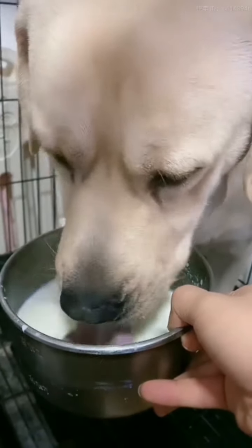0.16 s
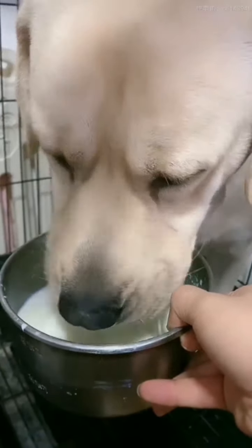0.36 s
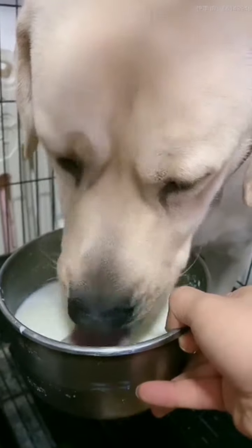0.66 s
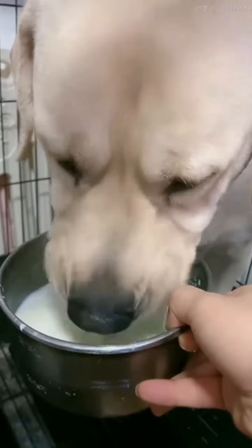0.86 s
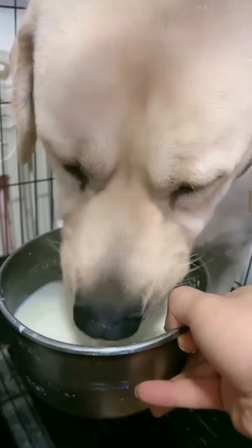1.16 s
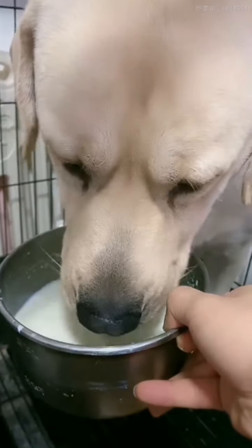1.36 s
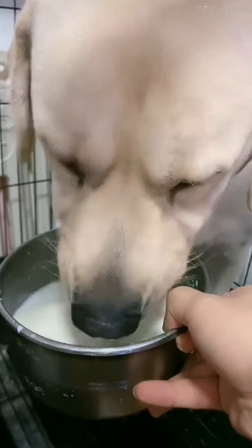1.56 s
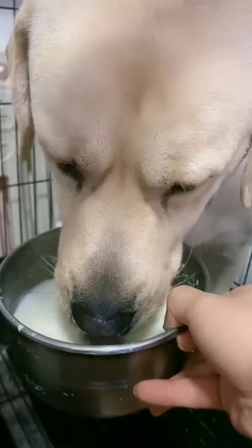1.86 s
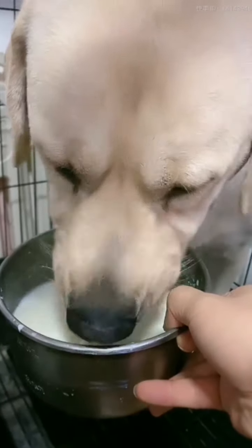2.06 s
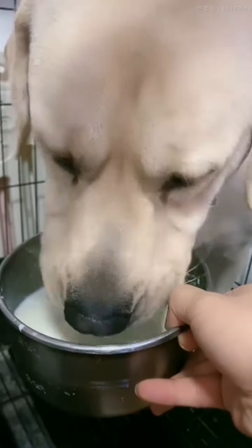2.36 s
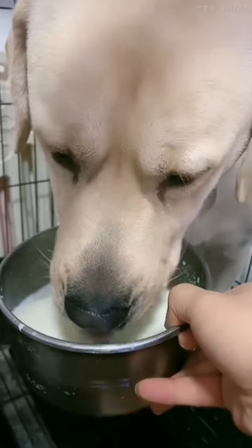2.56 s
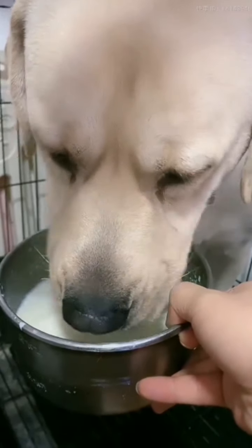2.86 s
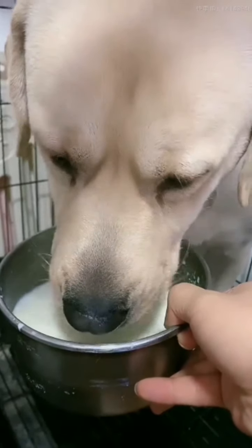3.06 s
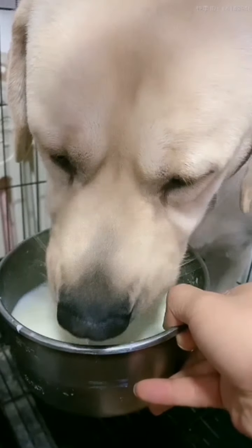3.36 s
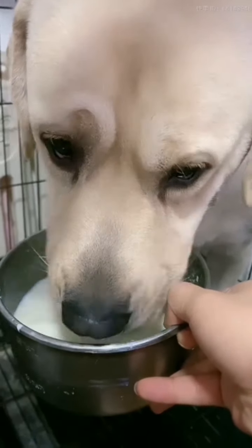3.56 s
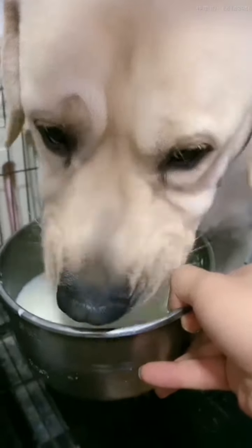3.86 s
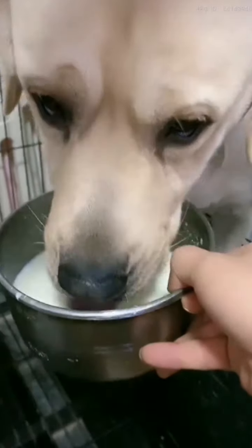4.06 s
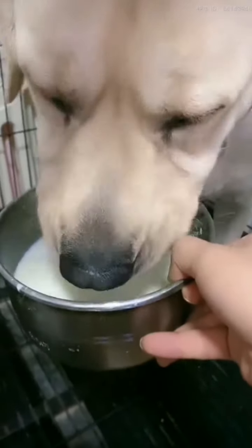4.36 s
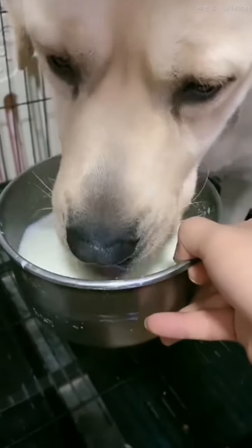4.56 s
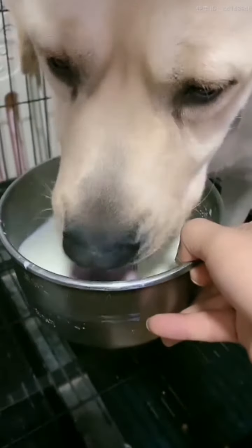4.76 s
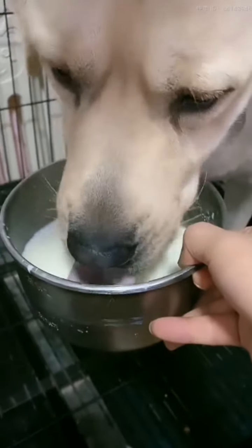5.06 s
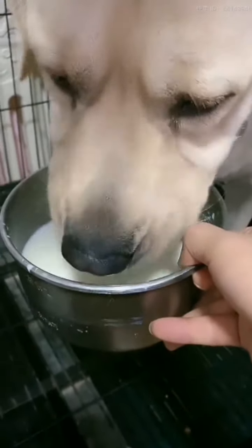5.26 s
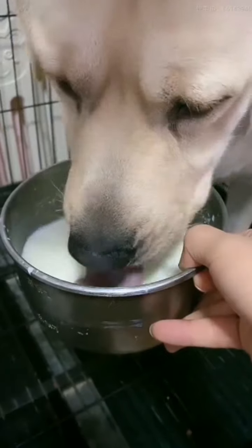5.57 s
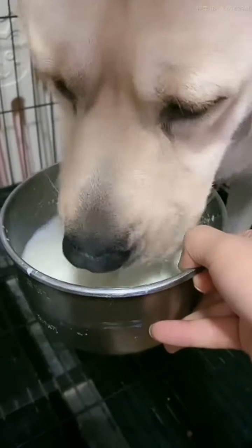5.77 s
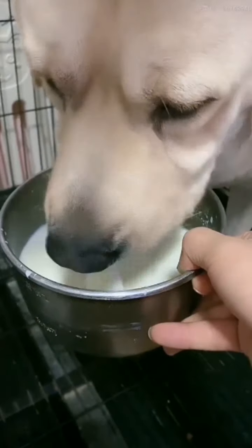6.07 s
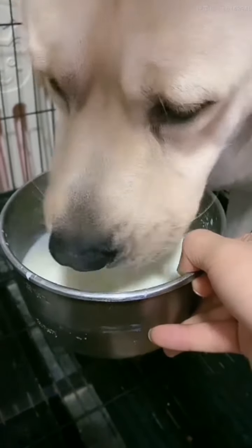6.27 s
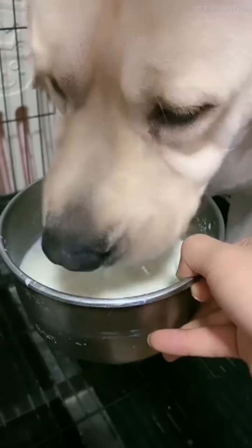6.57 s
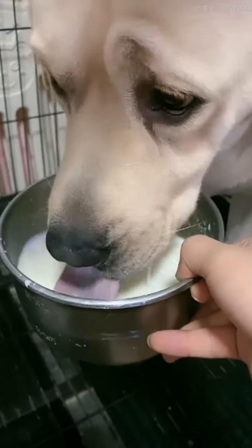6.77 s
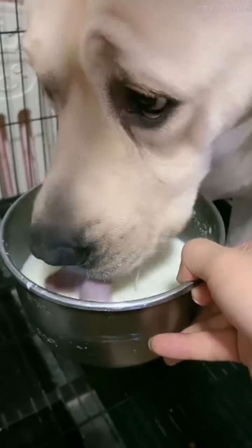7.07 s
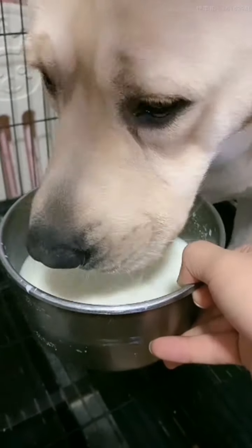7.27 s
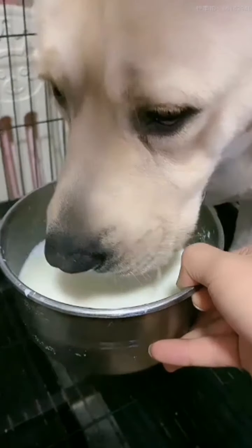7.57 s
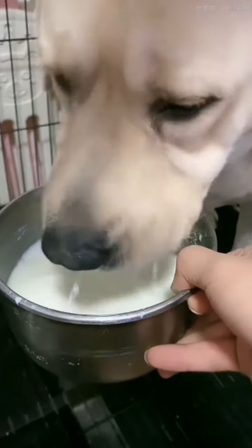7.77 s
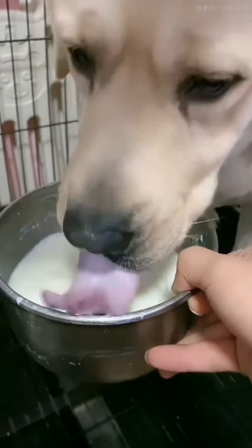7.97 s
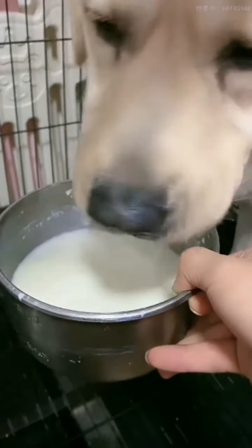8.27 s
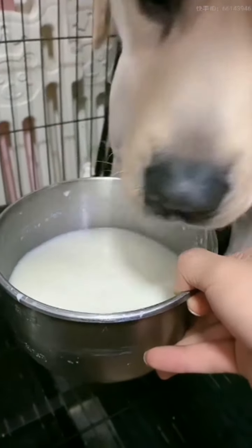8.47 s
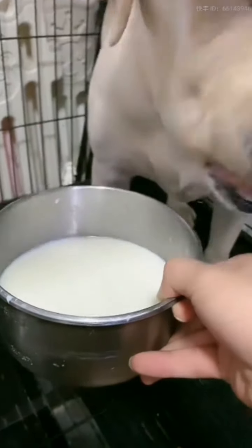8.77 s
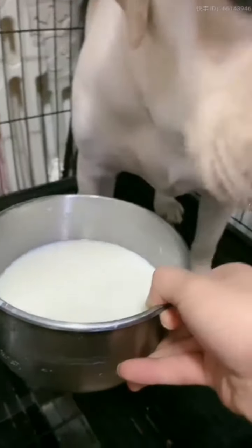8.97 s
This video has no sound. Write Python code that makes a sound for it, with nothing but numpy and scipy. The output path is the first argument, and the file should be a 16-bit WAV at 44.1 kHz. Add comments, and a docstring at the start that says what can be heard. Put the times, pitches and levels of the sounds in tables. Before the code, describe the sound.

A dog steadily laps milk from a steel bowl, a little over two wet plopping laps a second, louder toward the end, in a small hard room.

```python
"""In a small hard room, a dog laps milk from a hand-held steel bowl, a little over two laps a second.
The tongue's slap is a short-lived ringing air cavity with splash; bubbles and drops are brief rising notes.
The jaws shut with a low falling gulp and a squelch of bubble noise; milk crackles, smacks and slurps.
Steel modes, echoes and decaying noise are the answer of bowl and walls, over mains hum and a growing hiss."""
import sys
import numpy as np
from scipy import signal
from scipy.fft import rfft, irfft, next_fast_len
from scipy.io import wavfile

SR = 44100
rng = np.random.default_rng(int(sys.argv[2]) if len(sys.argv) > 2 else 0)


def master(y):
    """Save y as 16-bit WAV."""
    cut = np.clip(np.atleast_2d(y).T, -1, 1)
    pcm = np.round(cut * 32767)  # scale
    wavfile.write(sys.argv[1], SR, pcm.astype(np.int16))


N = 402633

# jaws shut: (time [s], relative gulp level [dB], relative squelch level [dB])
GULPS = [(0.010, -44, -31), (0.359, -31, -30.5), (0.877, -42, -16), (1.275, -37, -20.5),
         (1.673, -25, -26.5), (2.208, -27.5, -25.5), (2.592, -29, -25), (3, -27, -33), (3.552, -20.5, -19),
         (3.966, -22.5, -23.5), (4.414, -21, -31), (4.936, -22.5, -20.5), (5.333, -19.5, -24.5),
         (5.741, -20, -30), (6.231, -23.5, -16.5), (6.609, -17.5, -26.5), (7.014, -26.5, -20),
         (7.433, -24.5, -25.5), (7.991, -13.5, -11.5), (8.443, -11, -26), (9.105, -16.5, -32.5)]
# spectrum of crackling milk: (frequency [Hz], relative density [dB per Hz])
CRACKLE_SPECTRUM = [(120, -38), (300, -31.5), (600, -5), (900, -9.5), (1500, 0.5), (2200, 0), (3000, 3),
                    (3850, 0.5), (4400, -11.5), (5200, -6), (6200, -16), (7700, -17), (9200, -51),
                    (13000, -47), (15500, -53)]


def amp(db):
    """Level as a gain: 20 dB is a factor of ten in amplitude."""
    return 10 ** (np.asarray(db) / 20)


def unit(x):
    """Normalise the mean power: scale to rms 1."""
    return x / np.sqrt(np.mean(x ** 2) + 1e-20)


def along(points, hz):
    """Interpolate (frequency [Hz], value) points on a logarithmic frequency axis."""
    f, v = np.transpose(points)
    return np.interp(np.log(hz + 1), np.log(f + 1), v)


def curve(rows):
    """Interpolate (time [s], value) rows linearly at every sample."""
    return np.interp(np.arange(N) / SR, *np.transpose(rows))


def clock(count):
    """Sampling instants [s] of the first count samples."""
    return np.arange(count) / SR


def colour(x, spectrum):
    """Linear filtering: multiply the spectrum of x by a given one, then scale to rms 1."""
    size = next_fast_len(len(x))
    gain = amp(along(spectrum, np.fft.rfftfreq(size, 1 / SR)))
    return unit(irfft(rfft(x, size) * gain, size)[:len(x)])


def swell(t, peak_s):
    """Transient envelope: soft rise to 1 at peak_s, then exponential decay takes over."""
    u = t / max(peak_s, 1 / SR)
    return (u * np.exp(1 - u)) ** 2


def tone(hz):
    """Frequency modulation: the phase of the sine is the running sum of its pitch."""
    return np.sin(2 * np.pi * np.cumsum(hz) / SR)


def add(track, s, sound):
    """Superposition: mix a sound in at time s; what lies outside the track is dropped."""
    start = round(s * SR)
    sound, start = sound[max(-start, 0):], max(start, 0)
    track[start:start + len(sound)] += sound[:max(N - start, 0)]


def burst(sound, envelope):
    """Amplitude modulation with the envelope's energy, however the grains of the sound fall."""
    return unit(sound * envelope) * np.sqrt(np.mean(envelope ** 2))


def background(hum_hz=50, hum_db=-60.5, waver_db=1.15):
    """Background: a steady sine of mains hum, and filtered noise for hiss that grows louder and wavers."""
    # level of the hiss: (time [s], relative level [dB])
    hiss_level = [(0, -56), (4.7, -51.5), (5.3, -47), (7.6, -47.5), (9.13, -40)]
    # spectrum of the hiss: (frequency [Hz], relative density [dB per Hz])
    hiss_spectrum = [(25, -4.5), (70, -11.5), (130, 0.5), (300, -3), (700, -5.5), (1300, 10.5), (2600, 1.5),
                     (3700, -26), (4400, -19.5), (6000, -25.5), (9000, -29.5), (13000, -28.5), (15500, -37)]
    hum = amp(hum_db) * unit(tone(np.full(N, hum_hz)))
    waver = waver_db * colour(rng.standard_normal(N), [(6, 0), (40, -40), (200, -120)])
    hiss = colour(rng.standard_normal(N), hiss_spectrum)
    return hum + amp(curve(hiss_level) - 6 + waver) * hiss


def room(sound, early_db, tail_db, build_s=0.0055, shift=0.16):
    """Reverberation: direct sound, echoes that shift as the muzzle moves, then the decaying walls."""
    # decay of the walls: (frequency [Hz], time to fall 60 dB [s])
    wall_decay = [(200, 0.29), (500, 0.35), (1400, 0.27), (3500, 0.34), (8000, 0.16), (14000, 0.068)]
    # echoes from bowl, floor and cage: (nominal delay [s], relative level [dB])
    echo_rows = [(.0056, -9), (.0098, -7), (.017, -14.5)]
    hz, times, cells = signal.stft(rng.standard_normal(SR // 3), SR, nperseg=256)
    decay = amp(-60 * times / along(wall_decay, hz)[:, None])
    tail = signal.istft(cells * decay, SR, nperseg=256)[1]
    build_up = 1 - np.exp(-(clock(count=len(tail)) / build_s) ** 2)
    out = signal.fftconvolve(sound, tail * build_up)
    # tail_db is the energy of the tail relative to the direct sound
    out *= amp(tail_db) * np.linalg.norm(sound) / (np.linalg.norm(out) + 1e-20)
    out[:len(sound)] += sound
    for delay_s, db in echo_rows:
        start = round(abs(delay_s * (1 + shift * rng.uniform(-0.66, 1))) * SR)
        out[start:start + len(sound)] += amp(db + early_db) * sound
    return out


def bowl(x, ring_db=-3):
    """Modal resonance: every lapping sound faintly excites the steel, damped by milk and hand."""
    # modes of the steel: (frequency [Hz], relative level [dB], time to fall 60 dB [s])
    steel_modes = [(344.1, -19, 0.24), (618, -13.5, 0.027), (985.5, -18.5, 0.12), (1357, -24.5, 0.38),
                   (1494, -15.5, 0.12), (2490, -24.5, 0.11), (4960, -15.5, 0.026)]
    t = clock(count=SR // 2)
    ring = np.zeros(len(t))
    for hz, db, t60 in steel_modes:
        # a slowly dying mode is narrow and builds up to a high peak
        bandwidth_gain = 2 * np.log(1000) / (t60 * SR)
        ring += amp(db + 20 - 60 * t / t60) * np.cos(2 * np.pi * hz * t) * bandwidth_gain
    return x + amp(ring_db) * signal.fftconvolve(x, ring)[:N]


def fizz(count, rate, centre_hz, spread, cycles, rise=.12):
    """Bubble acoustics: many soft chirps, rising in pitch, of random time, pitch and size."""
    chance, t = rng.random((max(int(rate * count / SR), 1), 3)), clock(count=1024)
    hz = np.minimum(centre_hz * np.exp(spread * (2 * chance[:, :1] - 1)), SR / 2)
    size = np.sqrt(hz / np.maximum(chance[:, 1:2], .05))
    turns = hz * t
    phase = 2 * np.pi * turns * (1 + rise * np.tanh(turns / cycles / 2) / 2)
    waves = size * np.sin(phase) * swell(turns, cycles)
    where = (chance[:, 2:] * count).astype(int) + np.arange(len(t))
    return unit(np.bincount(where.ravel(), waves.ravel(), count)[:count])


def slosh(count, rate, centre_hz, spread, cycles, wash_db):
    """Granular and continuous sources superposed: tiny bubbles on the smooth wash of moving milk."""
    return fizz(count, rate, centre_hz, spread, cycles) + amp(wash_db) * rng.standard_normal(count)


def mouthful(gulp_db, squelch_db, wet_share=0.56, usual_db=-20, grows=1):
    """Source strength: a bigger mouthful crackles more, by grows dB per dB over the usual one."""
    return grows * (gulp_db + wet_share * (squelch_db - gulp_db) - usual_db)


def dribble(crackle_db=-41, wash_db=-5):
    """Film rupture: as the tongue lifts milk, films burst and small separate drops fall back."""
    # crackle through one lap: (time from the start of the tongue's lift [s], relative level [dB])
    lap_level = [(0, -3), (.04, -10), (.1, -1.5), (.14, -1), (.21, 3), (.27, -19), (.4, -25)]
    out, t = np.zeros(N), clock(count=SR // 2)
    flow = amp(np.interp(t, *np.transpose(lap_level))) * np.tanh(t / 0.0061)
    for s, gulp_db, squelch_db in GULPS:
        db = crackle_db + mouthful(gulp_db, squelch_db)
        grains = slosh(len(t), 340, 2500, 1, 5, wash_db)
        films = burst(colour(grains, CRACKLE_SPECTRUM), flow)
        # the lift begins 0.15 s before the jaws shut
        add(out, s - .15, room(amp(db) * films, early_db=-1.5, tail_db=-3.5))
    return out


def jaws(centre_hz=346.8, scatter_octaves=0.17, glide_s=0.0076):
    """Cavity resonance: the closing mouth sounds a falling low note and squeezes milk between the lips."""
    flap_spectrum = [(110, -24.0), (200, 6.5), (500, 1.5), (800, 0.0), (1500, -57.5)]
    out, t = np.zeros(N), clock(count=6000)
    for s, db, squelch_db in GULPS:
        hz = centre_hz * 2 ** (scatter_octaves * rng.uniform(-1.07, 1))
        # no two mouthfuls close at quite the same speed
        fall = np.exp(-t / (glide_s * amp(1.7 * rng.uniform(-1.2, 1))))
        note = tone(hz * (0.541 + 1.303 * fall)) * swell(t, 0.0074) ** 2.03
        flap = colour(rng.standard_normal(len(t)), flap_spectrum) * swell(t, 0.01)
        gulp = amp(db - 5.5) * (note + amp(-10.0) * flap)
        squeeze = (1 - np.exp(-t / 0.0055)) * np.exp(-t / 0.027)
        droplets = slosh(len(t), 480, 2500, 1, 4.5, wash_db=-4)
        squelch = amp(squelch_db - 11.5) * burst(colour(droplets, CRACKLE_SPECTRUM), squeeze)
        gulp_in_room = room(gulp, early_db=-32.5, tail_db=-8.0)
        squelch_in_room = room(squelch, early_db=-15.5, tail_db=-0.5)
        add(out, s - .0015, gulp_in_room + squelch_in_room)
    return out


def wet_note(pitch, spray_db=-13, quiver=0.033):
    """Air-pocket resonance: a note on a quivering pitch, with a little spray around it."""
    hz = np.median(pitch)
    shape = quiver * colour(rng.standard_normal(len(pitch)), [(400, 0), (1200, -60)])
    mouth = colour(rng.standard_normal(len(pitch)), CRACKLE_SPECTRUM)
    spray = colour(mouth, [(hz / 8, -40), (hz / 2, -2), (hz, 0), (hz * 6, -40)])
    return tone(pitch * (1 + shape)) + amp(spray_db) * spray


def bubbles(rise=.08):
    """Bubble resonance: each bubble or drop rings briefly and rises in pitch as it nears the surface."""
    # ringing bubbles and drops: (time [s], relative level [dB], nominal pitch [Hz], swell time [s])
    bubble_rows = [(0.013, -27, 1596, 0.0052), (.2, -40.5, 2450, 0.0063), (.314, -28.5, 796, 0.0027),
                   (.588, -40, 2650, 0.0048), (.711, -25, 1023, 0.0059), (0.927, -24, 3120, 0.004),
                   (1.453, -20.5, 2740, 0.0024), (1.513, -27, 2420, 0.0034), (1.709, -20.5, 1680, 0.0023),
                   (1.909, -38, 2390, .004), (2.025, -36.5, 3740, .003), (2.306, -15.5, 1753, 0.0051),
                   (2.848, -23.5, 1390, 0.0037), (2.96, -21.5, 3570, 0.0016), (3.35, -26.5, 3750, 0.0033),
                   (3.607, -18.5, 1510, 0.0023), (3.812, -20.5, 1270, 0.0044), (3.895, -27.5, 1037, 0.0053),
                   (3.928, -12.5, 1663, 0.003), (3.944, -20, 2050, 0.0075), (4.028, -14, 3530, 0.0017),
                   (4.225, -16, 3040, 0.0028), (4.225, -21.5, 3660, 0.0028), (4.226, -27.5, 1220, 0.0041),
                   (4.789, -26.5, 1100, 0.0067), (4.887, -18.5, 2796, 0.0055), (4.975, -18.5, 1620, 0.002),
                   (5.387, -13, 1692, 0.0028), (5.569, -25.5, 3640, .002), (5.683, -16.5, 1694, 0.003),
                   (5.775, -12, 1645, 0.0017), (6.187, -13, 3440, 0.003), (6.188, -20, 1640, .003),
                   (6.286, -17.5, 2600, 0.003), (6.662, -18.5, 2760, 0.0032), (6.970, -15.5, 3560, 0.0021),
                   (7.178, -30.5, 2736, 0.0056), (7.379, -13, 780, 0.0023), (7.84, -10.5, 1373, 0.006),
                   (7.925, -6.5, 975, 0.0032), (8.051, -8, 2585, 0.0031), (8.463, -8.5, 2706, 0.0038),
                   (8.465, -10.5, 2110, 0.0096), (8.723, -23.5, 1635, 0.0053), (8.867, -22, 2960, 0.0055),
                   (9.014, -19.5, 1014, 0.0024)]
    out, t = np.zeros(N), clock(count=3072)
    for s, db, hz, swell_s in bubble_rows:
        note = wet_note(hz * (1 + rise * np.tanh(t / swell_s / 2 - .5)))
        add(out, s, room(amp(db - 7.0) * note * swell(t, swell_s), early_db=0.5, tail_db=-2.5))
    return out


def tongue(peak_s=.0023, collapse_s=0.0012, bright_hz=2500):
    """Cavity resonance: an air cavity builds up, rings and breaks into gurgling bubbles and a splash."""
    # tongue hits the milk: (time [s], relative cavity level [dB], nominal cavity pitch [Hz],
    # relative splash level [dB], relative bright smack level [dB], churn time [s], build-up time [s])
    slap_rows = [(0.22, -18.5, 1340, -40, -58, 0.0044, .001),
                 (0.6503, -10.5, 1201, -61, -29.5, 0.0042, 0.0016),
                 (1.134, -23.5, 1094, -45, -67, 0.0077, 0.0026), (1.53, -30, 1384, -43, -54, 0.013, 0.0021),
                 (2.0608, -8, 1242, -30, -28, 0.0036, 0.0019),
                 (2.225, -19, 1223, -36.5, -56, 0.011, 0.0034), (2.4439, -15, 1211, -35, -59, 0.0092, .001),
                 (2.861, -12.5, 1225, -36.5, -48, 0.0042, 0.0025),
                 (3.394, -17.5, 1196, -32, -32.5, 0.0083, .004),
                 (3.827, -9.5, 1169, -49, -37.5, 0.0044, .002),
                 (4.274, -25.5, 1093, -54, -42, 0.0043, 0.0043), (4.335, -26, 1450, -42, -38, .004, 0.0021),
                 (4.792, -32.5, 1085, -35.5, -37.5, 0.0061, 0.0032),
                 (5.201, -32.5, 1490, -58, -43.5, 0.0079, 0.0027),
                 (5.603, -8, 1283, -36.5, -44, 0.0074, 0.00084),
                 (6.0824, -7, 1359, -28.5, -41, 0.0033, .0009),
                 (6.4664, -8.5, 1449, -27.5, -35.5, 0.0055, 0.0017),
                 (6.876, -22, 1267, -43, -43, 0.0068, 0.003),
                 (7.2908, -12.5, 1236, -51, -63, 0.0035, 0.0018),
                 (7.8257, -6, 1336, -26, -51.5, 0.011, 0.0027),
                 (7.9212, -16.5, 983, -38, -23.5, 0.004, 0.0014),
                 (8.277, -36, 780, -38.5, -37, 0.0093, .006), (8.888, -12.5, 1195, -25, -32, 0.012, 0.0035)]
    # spectrum of the splash: (frequency [Hz], relative density [dB per Hz])
    splash_spectrum = [(110, -37.5), (220, -26), (330, -9.5), (560, -3), (800, 2), (1400, -6), (2100, -19),
                       (3500, -9), (4400, -19.5), (5200, -13.5), (7300, -31), (9000, -56), (15000, -64.5)]
    out, t = np.zeros(N), clock(count=4096)
    # the sound starts 20 ms early, to leave room for the build-up
    lead = SR // 50
    since_peak = t - lead / SR - peak_s
    for s, db, hz, low_db, high_db, churn_s, build_s in slap_rows:
        pitch = hz * (1 + 0.06 * np.tanh(since_peak / 0.016))
        collapse = np.exp(-(np.maximum(since_peak, 0) / collapse_s) ** 2)
        opening = collapse / np.cosh(np.minimum(since_peak, 0) / build_s) ** 2
        slap = amp(db - 3) * tone(pitch) * opening
        churn = swell(t, churn_s)
        gurgle = amp(db - 14) * burst(fizz(len(t), 1100, hz, .33, 1.37), churn)
        bright = amp(high_db + 0.5) * burst(fizz(len(t), 800, bright_hz, 0.17, 2), churn)
        spatter = colour(rng.standard_normal(len(t)), splash_spectrum)
        splash = amp(low_db - 2.5) * spatter * swell(t, 0.0024 + churn_s / 2)
        slap[lead:] += (gurgle + bright + splash)[:-lead]
        add(out, s - lead / SR, room(slap, early_db=-2.0, tail_db=-4.5))
    return out


def packet(t, peak_s, width_s):
    """Gaussian wave-packet envelope: starts from silence and peaks at peak_s."""
    return np.exp(-((t - peak_s) / width_s) ** 2) * np.sin(np.pi / 2 * np.clip(t / peak_s, 0, 1)) ** 2


def smacks(cycles=1.78, wet_db=-10.5):
    """Impulsive release: a film of milk snaps, a pop of a few cycles wrapped in a wet burst."""
    # tongue and lips part: (time [s], relative level [dB], pitch [Hz])
    smack_rows = [(.7225, -9.5, 1364), (.835, -24.5, 3650), (.878, -21, 1740), (1.322, -20.5, 1700),
                  (2.62, -16, 2170), (3.015, -20, 2420), (3.442, -27.5, 6620), (3.486, -12.5, 3030),
                  (3.494, -14, 3500), (4.437, -18, 1930), (4.88, -12.5, 4610), (4.944, -12.5, 2170),
                  (4.989, -14, 1730), (5.345, -10.5, 1860), (5.3905, -10, 1870), (5.746, -14.5, 2340),
                  (5.958, -30, 1970), (6.231, -14, 2160), (6.234, -15.5, 5060), (6.2535, -8, 1790),
                  (6.564, -25.5, 763), (6.615, -12.5, 2100), (7.024, -13.5, 2040), (7.068, -14.5, 2340),
                  (7.443, -14.5, 2950), (7.92, -9.5, 2860), (8.006, -12, 1910)]
    out, t = np.zeros(N), clock(count=2048)
    for s, db, hz in smack_rows:
        pop = tone(np.full(len(t), hz)) * packet(t, .0025, cycles / hz)
        mouth = colour(rng.standard_normal(len(t)), CRACKLE_SPECTRUM)
        around_pop = [(hz / 8, -34), (hz / 2, -5), (hz * 1.33, 0), (hz * 2.8, -11), (hz * 6, -30)]
        wet = colour(mouth, around_pop) * swell(t, 0.0033)
        add(out, s, room(amp(db - 6.0) * (pop + amp(wet_db) * wet), early_db=-0.5, tail_db=-3.5))
    return out


def slurps():
    """Gap resonance: milk is sucked between tongue and lip; the note sweeps as the gap changes size."""
    # sucked milk: (time [s], relative level [dB], first pitch [Hz], last pitch [Hz], length [s])
    slurp_rows = [(.94, -31.5, 1345, 1076, 0.056), (1.018, -23, 3200, 1435, 0.021),
                  (1.212, -27.5, 1590, 1780, 0.044), (2.456, -15.5, 2050, 3490, 0.024),
                  (5.757, -13, 917, 1550, 0.011), (5.957, -22, 1933, 2410, 0.023),
                  (6.019, -30.5, 2520, 2730, .026)]
    out = np.zeros(N)
    for s, db, from_hz, to_hz, length_s in slurp_rows:
        u = np.linspace(0, 1, int(length_s * SR))
        note = wet_note(from_hz * (to_hz / from_hz) ** u, spray_db=-15, quiver=0.062)
        add(out, s, room(amp(db) * note * np.sqrt(u) * (1 - u), early_db=-2, tail_db=-3.0))
    return out


def ticks():
    """Broadband transients: short bright spatters of filtered noise."""
    # sharp little ticks: (time [s], relative level [dB])
    tick_rows = [(7.918, -39), (8.2898, -40), (8.358, -39.5), (9.0148, -52.5)]
    # spectrum of a tick: (frequency [Hz], relative density [dB per Hz])
    tick_spectrum = [(1000, -14), (6000, 13.5), (10000, -14), (13000, -4), (15500, -26)]
    out, t = np.zeros(N), clock(count=1024)
    for s, db in tick_rows:
        spatter = colour(rng.standard_normal(len(t)), tick_spectrum) * swell(t, 0.0037)
        add(out, s, room(amp(db + 4.0) * spatter, early_db=-4.5, tail_db=-5.5))
    return out


def scene():
    """Superposition of all the lapping sounds in the bowl, the ticks and the room's background."""
    lapping = bowl(tongue() + bubbles() + slurps() + smacks() + jaws() + dribble())
    # a small microphone picks up little bass
    bass_cut = signal.butter(4, 150, "highpass", fs=SR, output="sos")
    lapping = signal.sosfilt(bass_cut, lapping)
    return (lapping + ticks() + background())[None]


def record(dry, top_hz=15700):
    """Band limitation: nothing passes at or above top_hz."""
    size = next_fast_len(N + SR // 2)
    passed = np.fft.rfftfreq(size, 1 / SR) < top_hz
    return irfft(rfft(dry, size) * passed, size)[:, :N]


dry = scene()
out = record(dry)
master(out)
```